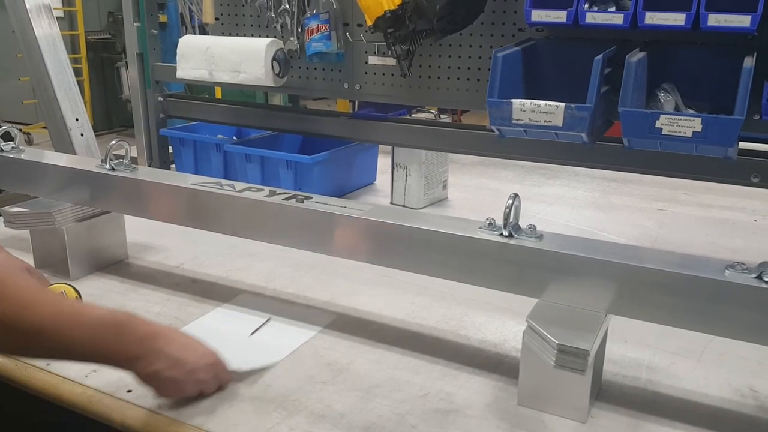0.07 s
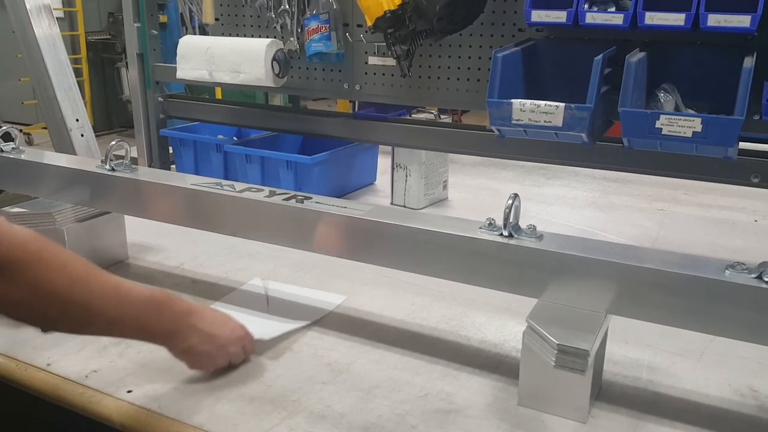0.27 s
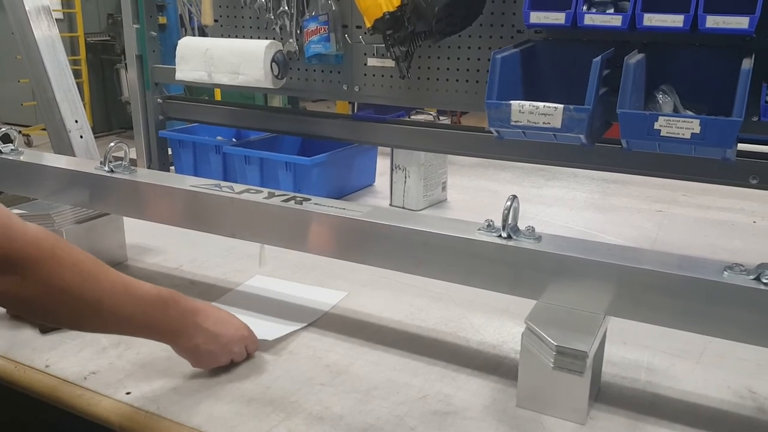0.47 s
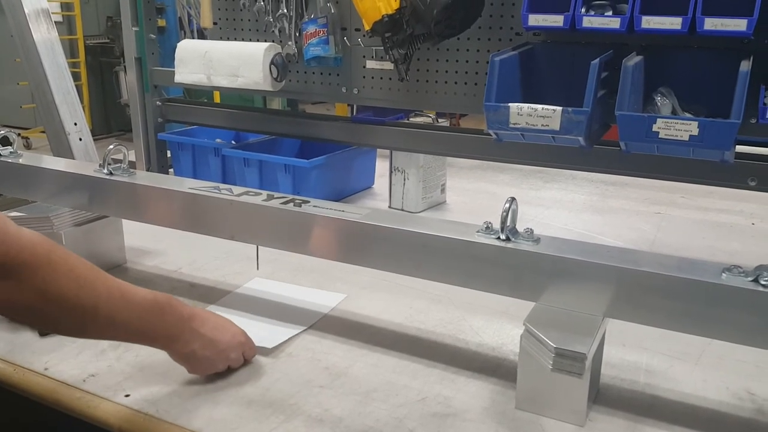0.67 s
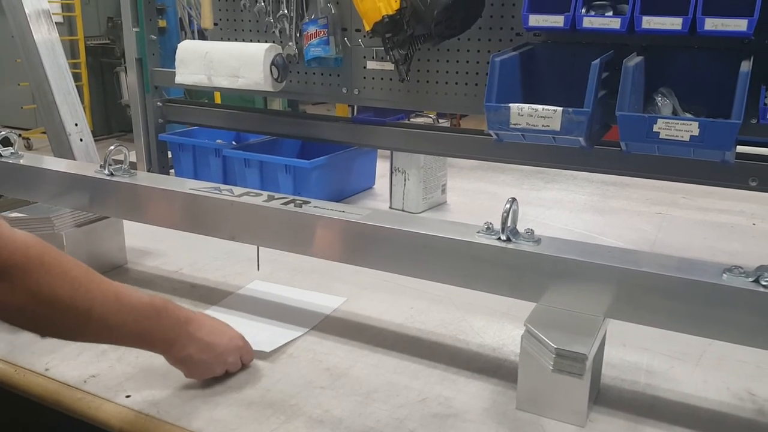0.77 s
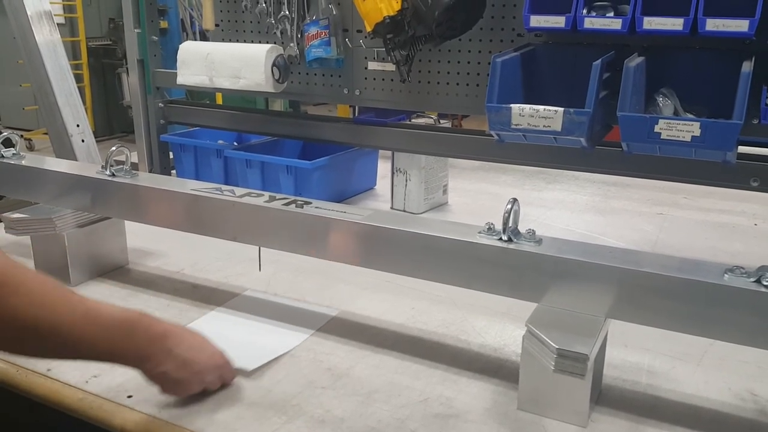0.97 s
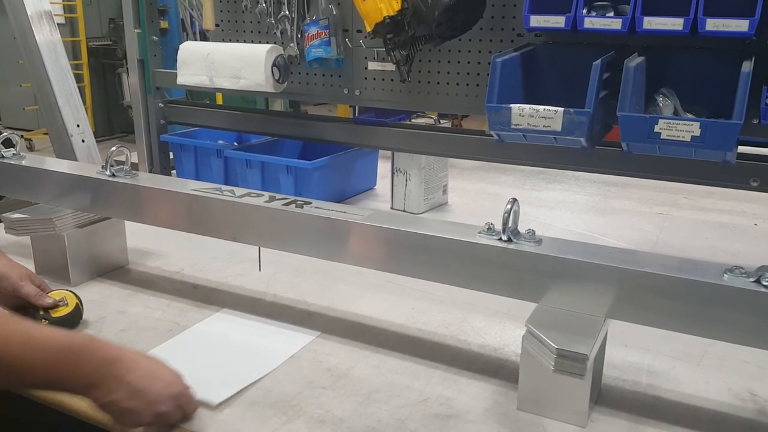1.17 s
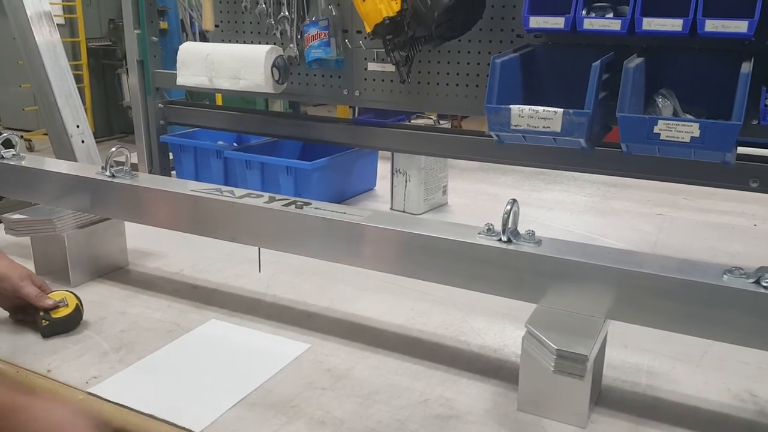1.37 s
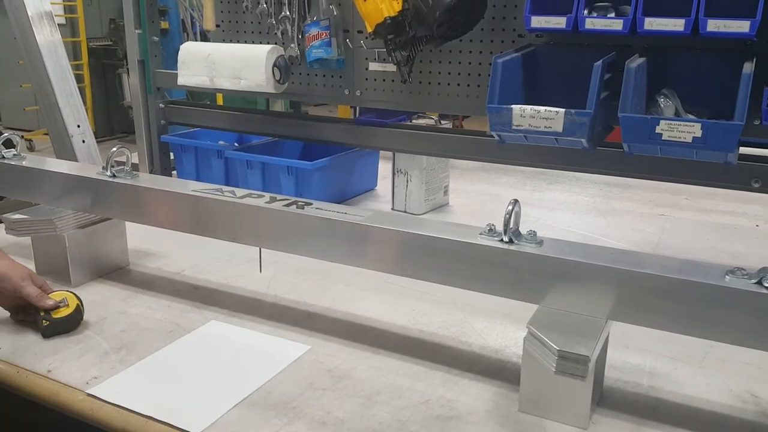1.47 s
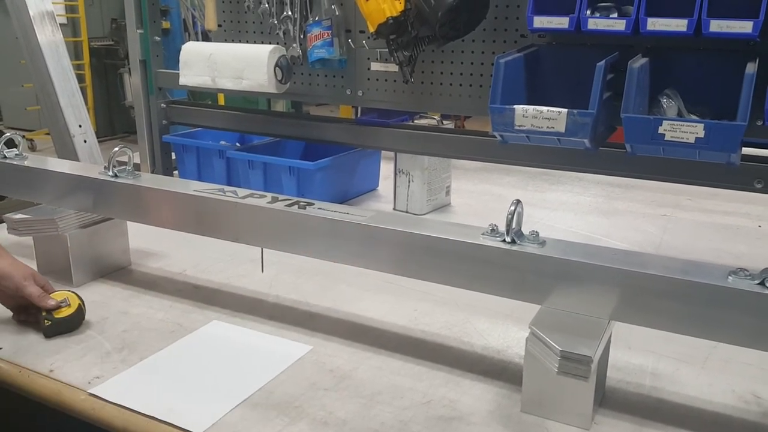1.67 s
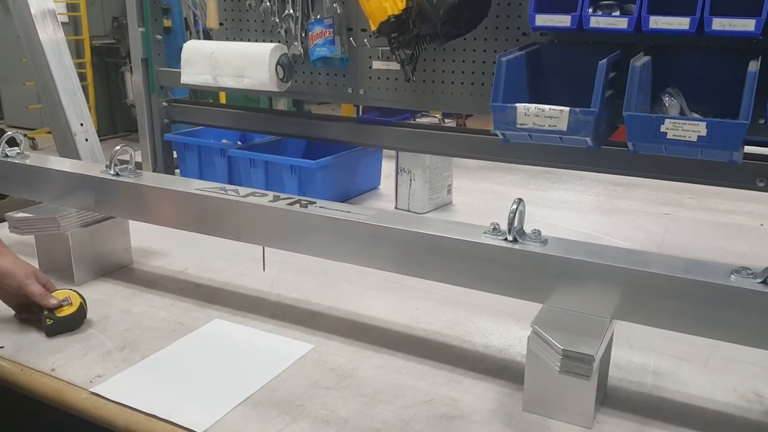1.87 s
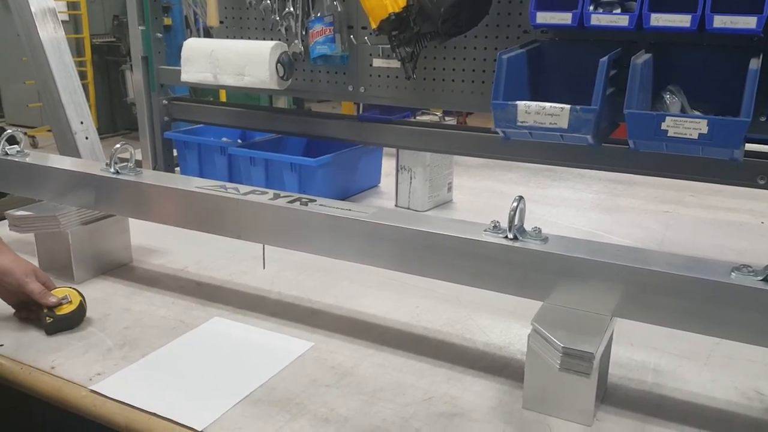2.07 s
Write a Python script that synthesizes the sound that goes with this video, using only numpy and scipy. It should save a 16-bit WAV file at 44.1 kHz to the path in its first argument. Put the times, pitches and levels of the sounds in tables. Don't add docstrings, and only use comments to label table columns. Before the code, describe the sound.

Sharp, overloaded metal clack of a nail hitting a magnet under a hollow beam, amid paper rustle

```python
import sys
import numpy as np
from scipy import signal
from scipy.fft import rfft, irfft
from scipy.io import wavfile
from scipy.ndimage import uniform_filter1d

SR = 44100
rng = np.random.default_rng(int(sys.argv[2]) if len(sys.argv) > 2 else 0)


def master(y):
    cut = np.clip(np.atleast_2d(y).T, -1, 1)
    pcm = np.round(cut * 32767)
    wavfile.write(sys.argv[1], SR, pcm.astype(np.int16))


def amplitude_ratio(level_db):
    exponent = np.asarray(level_db, float) / 20
    return 10 ** exponent


N = 93359

# f/Hz, level/dB rms
HUM_LINES = [(60, -76), (120, -60), (180, -71.5), (240, -48), (300, -66), (360, -63.5), (480, -63),
             (720, -69)]
# f/Hz, level/dB per Hz
VENTILATION = [(30, -25), (70, -4.5), (120, -4), (180, -11.5), (400, -12.5), (1360, -15.5), (4500, -26.5),
               (15500, -38)]
# t/s, length/s, level/dB, centre f/Hz, width/Hz
PAPER_STROKES = [(-.05, 0.12, -46.5, 2680, 1000), (-.05, 0.39, -54, 1500, 1500),
                 (-.05, 0.43, -48.5, 5760, 14420), (.25, 0.16, -58.5, 7900, 14000),
                 (.0, 0.12, -52.5, 13000, 4000), (0.101, 0.12, -46, 3600, 2200),
                 (.13, .21, -44.5, 13200, 4000), (0.129, .08, -50.5, 10400, 1973),
                 (.78, .22, -62, 12500, 5980), (1.027, 0.094, -50.5, 12500, 5000),
                 (.95, .27, -50, 3600, 1649), (1.0, .25, -53, 10020, 9980), (1.195, 0.086, -55, 2470, 3000),
                 (1.275, 0.14, -55, 9000, 8000), (1.32, .09, -57, 5500, 2500),
                 (1.414, 0.056, -62, 1292, 1500), (1.588, 0.21, -53.5, 1200, 1790),
                 (1.994, 0.095, -62, 3190, 1990)]
# t/s, level/dB, centre f/Hz, width/Hz, t60/s
CRACKLES = [(.019, -35, 13000, 4000, 0.0094), (0.098, -37, 3500, 3000, 0.063),
            (0.105, -39.5, 2620, 2000, 0.081), (.1075, -31, 4500, 4512, 0.029),
            (.133, -27, 11930, 6000, .008), (.212, -32, 13000, 3000, 0.011), (.264, -37, 13500, 4035, .008),
            (1.2092, -38, 10100, 3980, 0.021), (1.385, -44, 8000, 6080, .03),
            (1.3885, -48, 9000, 6020, .02), (1.651, -42, 1100, 603, 0.043), (1.652, -51, 4000, 4970, 0.028),
            (1.775, -58, 3500, 4970, .03), (0.456, -36, 250, 400.8, 0.24),
            (1.907, -38.5, 379, 119.7, 0.078), (1.962, -39, 392, 139.3, 0.086)]
# delay after the snap t/s, level/dB
NAIL_REBOUNDS = [
    (.0040, -3.5),
    (.0155, -11),
    (.031, -18),
    (.044, -16.5),
]
# f/Hz, level/dB per Hz
WALL_CRACK = [(1200, -26), (1760, -6), (2300, -12), (3350, -1), (5300, -11.5), (7500, -7), (10500, -10),
              (15500, -21)]
# f/Hz, level/dB, t60/s
NAIL_MODES = [(1620, -12, 0.045), (1840, -12, 0.065), (2917, -2.5, 0.038), (3256, -8, .06),
              (3491, -6, 0.078), (3600, -6.5, .1), (3808, -4, .05), (6830, -13, 0.093), (7520, -11.5, .1),
              (8250, -9, 0.041), (9880, -12.5, .06), (10570, -11, 0.12), (13000, -17, 0.051)]
# f/Hz, level/dB, t60/s
BEAM_MODES = [(1649, -5.5, 0.54), (2050, -2, .3), (2422, -6.5, .4), (3000, -5, .5), (3250, -6.5, .45),
              (3545, -6.5, 0.55), (3618, 0, 0.61), (3725, -4, 0.63), (3780, -4, .4), (4120, -9, .4),
              (7545, -6.5, 0.34)]
# f/Hz, level/dB, t60/s
JOLT_MODES = [(250, -9, .035), (590, 4, .03), (890.7, -1.5, 0.048), (1750, 15, .028), (2939, 20.5, 0.018),
              (3500, 12, .018)]
# f/Hz, level/dB per Hz
NEAR_ECHO = [(350, -62), (600, -30), (1200, -16.5), (1580, -5), (3380, -6.5), (3660, -4), (5150, -14),
             (10400, -15), (15500, -27.5)]
# f/Hz, level/dB per Hz
ROOM_WASH = [(500, -35), (950, -18), (1690, -5), (3670, 0), (5310, -10.5), (7680, -3.5), (10500, -9),
             (15500, -20)]
# f/Hz, t60/s
ROOM_T60 = [(700, 0.29), (1500, 1), (3000, 0.92), (6000, 0.75), (11000, .44), (15000, .36)]

SNAP_S, SNAP_DB = .4092, 1.5
CONTACT_S = 0.000041
ROOM_RISE_S = 0.014


def level(x, db):
    return x * amplitude_ratio(db) / np.sqrt(np.mean(x ** 2))


def read(table, hz):
    table = np.array(table, float)
    return np.interp(np.log(hz), np.log(table[:, 0]), table[:, 1])


def band(x, hz, width_hz):
    f = np.arange(len(x) // 2 + 1) * SR / len(x)
    return irfft(rfft(x) / (1 + ((f - hz) / (width_hz / 2)) ** 2), len(x))


def colour(table):
    f = np.maximum(np.arange(N // 2 + 1) * SR / N, 1)
    low_cut = np.minimum(f / table[0][0], 1) ** 2
    white = rfft(rng.standard_normal(N))
    return level(irfft(white * amplitude_ratio(read(table, f)) * low_cut, N), 0)


def fall(start_s, t60_s, rise_s):
    t = np.maximum(np.arange(N) / SR - start_s, 0)
    return (1 - np.exp(-t / rise_s)) * amplitude_ratio(-60 * t / t60_s)


def swell(start_s, len_s, edge_s):
    t = np.arange(N) / SR - start_s
    nearest_edge = np.minimum(t + edge_s / 2, len_s + edge_s / 2 - t)
    return np.sin(np.pi / 2 * np.clip(nearest_edge / edge_s, 0, 1)) ** 2


def walk(rate):
    k = int(SR / rate)
    held = np.repeat(rng.standard_normal(N // k + 1), k)
    w = uniform_filter1d(uniform_filter1d(held, k), k)[:N]
    return w / w.std()


def ring(modes, t60_max_s, start_s=SNAP_S, rough=0):
    t = np.maximum(np.arange(N) / SR - start_s, 0)
    phases = rng.uniform(0, 2 * np.pi, len(modes))
    out = 0
    for (hz, db, t60), phase in zip(modes, phases):
        tone = np.sin(2 * np.pi * hz * t + phase)
        beating = 1 + rough * walk(50) if rough else 1
        out = out + amplitude_ratio(db) * tone * fall(start_s, min(t60, t60_max_s), CONTACT_S) * beating
    return out


def workshop():
    t = np.arange(N) / SR
    hum = 0
    for hz, db in HUM_LINES:
        wobble_db = .5 * walk(15)
        hum = hum + np.sqrt(2) * amplitude_ratio(db + wobble_db) * np.sin(2 * np.pi * (hz * t + rng.random()))
    return hum + amplitude_ratio(-51.5 + 0.57 * walk(5.2)) * colour(VENTILATION)


def paper_strokes():
    out = 0
    for start_s, len_s, db, hz, width_hz in PAPER_STROKES:
        friction = rng.standard_normal(N)
        grain_db, flicker_db = 1.6 * walk(400), .8 * walk(40)
        grit = friction * amplitude_ratio(grain_db + flicker_db)
        out = out + level(band(grit, hz, width_hz), db) * swell(start_s, len_s, .03 + .3 * len_s)
    return out


def crackles():
    out = 0
    for start_s, db, hz, width_hz, t60 in CRACKLES:
        burst = level(band(rng.standard_normal(N), hz, width_hz), db)
        out = out + burst * fall(start_s, t60, 0.00034)
    return out


def nail_contacts():
    wall, out = colour(WALL_CRACK), 0
    for late_s, db in [(0, -3.5), *NAIL_REBOUNDS]:
        at = SNAP_S + late_s
        crack = amplitude_ratio(-1.5) * wall * fall(at, 0.046, 0.001)
        nail = amplitude_ratio(-4.5) * ring(NAIL_MODES, .12, at)
        out = out + amplitude_ratio(db) * (crack + nail)
    return out


def beam():
    return amplitude_ratio(-26.5) * ring(BEAM_MODES, .6, rough=.6) + amplitude_ratio(-16) * ring(JOLT_MODES, .1)


def room_echo():
    out = amplitude_ratio(-11.5) * colour(NEAR_ECHO) * fall(SNAP_S, 0.29, ROOM_RISE_S)
    wash = rfft(colour(ROOM_WASH))
    f = np.maximum(np.arange(N // 2 + 1) * SR / N, 1)
    for step in range(36, 57):
        share = np.clip(1 - abs(4 * np.log2(f) - step), 0, 1)
        t60 = read(ROOM_T60, 2 ** (step / 4))
        out = out + amplitude_ratio(-24) * irfft(wash * share, N) * fall(SNAP_S, t60, ROOM_RISE_S)
    return out


def phone_gain():
    duck_db, duck_s, hold_until_s, recover_db_per_s, settle_db = -13, .03, 1, 20, -3.5
    t = np.arange(N) / SR
    recovery_db = duck_db + recover_db_per_s * np.maximum(t - hold_until_s, 0)
    ducking = np.clip((t - SNAP_S) / duck_s, 0, 1)
    return amplitude_ratio(np.minimum(recovery_db, settle_db) * ducking)


def case_drag():
    t = np.arange(N) / SR
    board = np.sin(2 * np.pi * 105 * t + 0.63 * walk(18)) * amplitude_ratio(.8 * walk(30))
    low_rub = band(rng.standard_normal(N), 132, 90)
    high_rub = band(rng.standard_normal(N), 400, 252)
    rubbing = level(board, -46) + level(low_rub, -48) + level(high_rub, -51)
    return rubbing * swell(1.935, .17, .1)


def scene():
    snap = amplitude_ratio(SNAP_DB) * (nail_contacts() + beam() + room_echo())
    background = paper_strokes() + crackles() + case_drag() + workshop()
    return (snap + phone_gain() * background)[None]


def top_cut(x):
    return signal.sosfilt(signal.butter(12, 15690, fs=SR, output="sos"), x)


def record(dry):
    clipped = np.clip(dry, -1, 1)
    return top_cut(clipped)


dry = scene()
out = record(dry)
master(out)
```